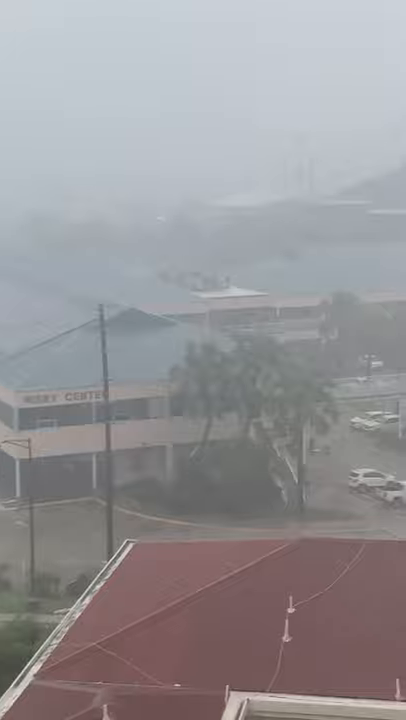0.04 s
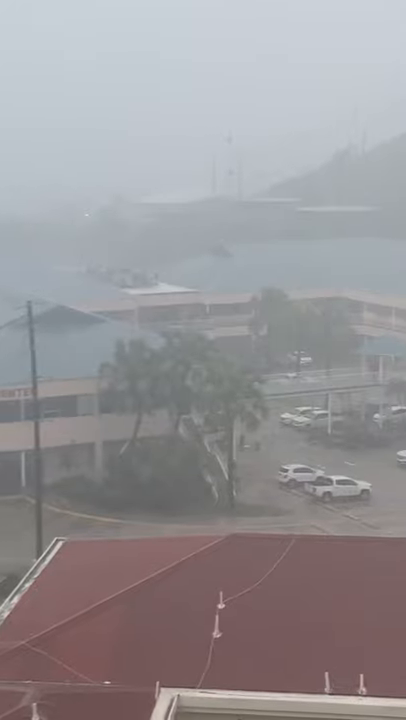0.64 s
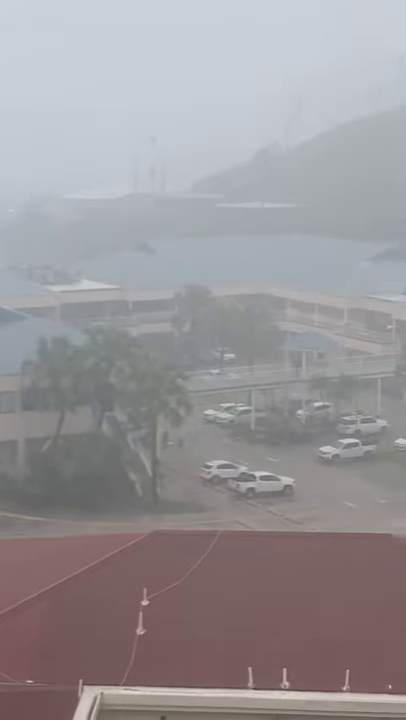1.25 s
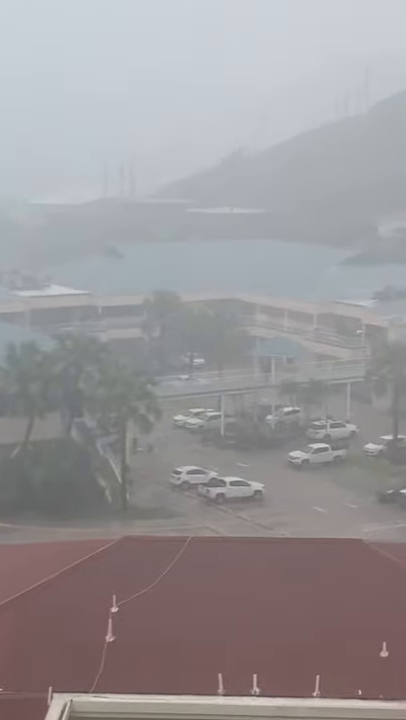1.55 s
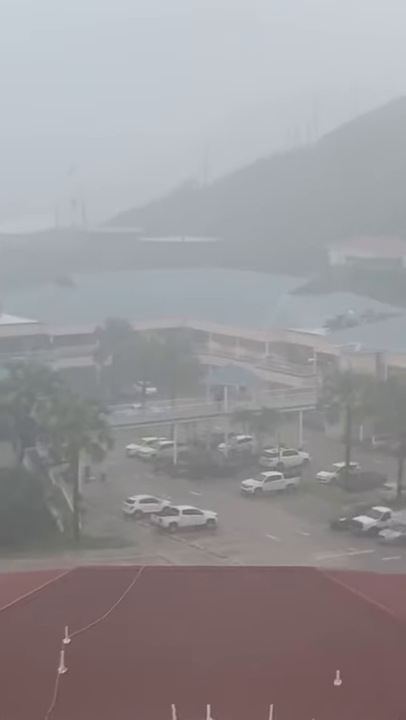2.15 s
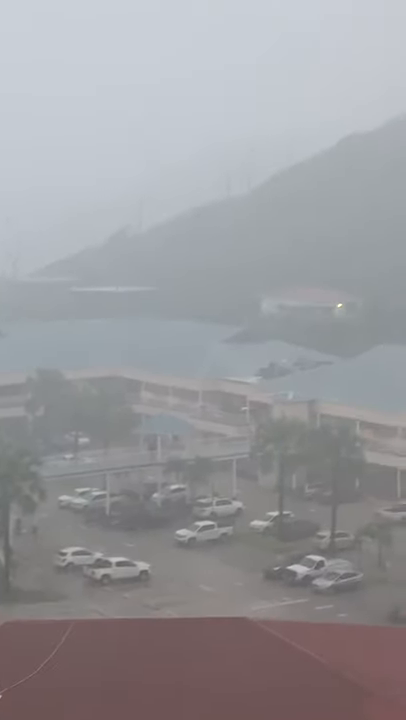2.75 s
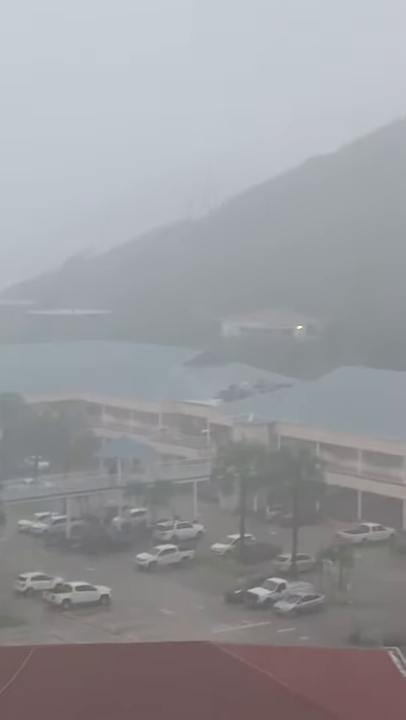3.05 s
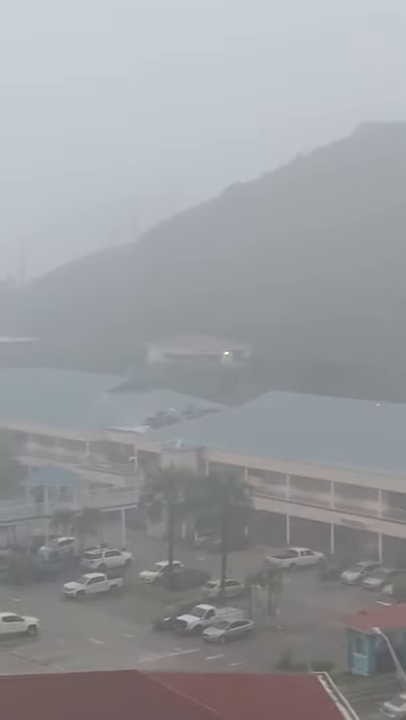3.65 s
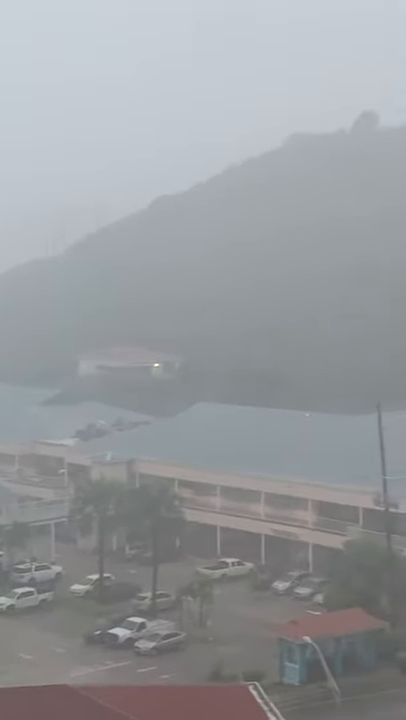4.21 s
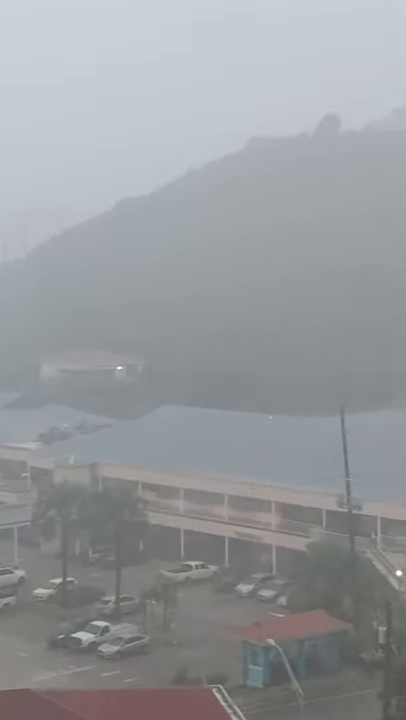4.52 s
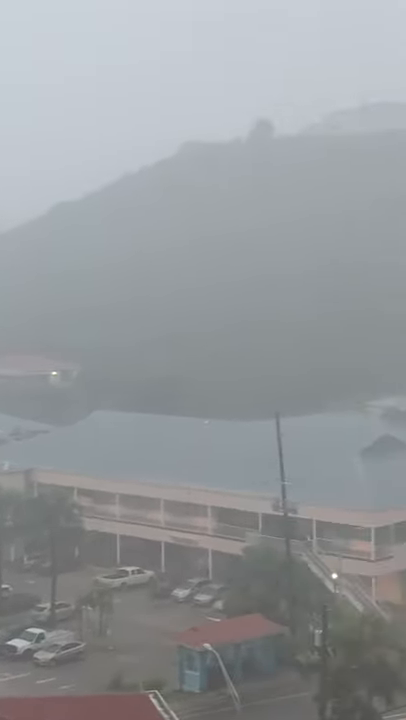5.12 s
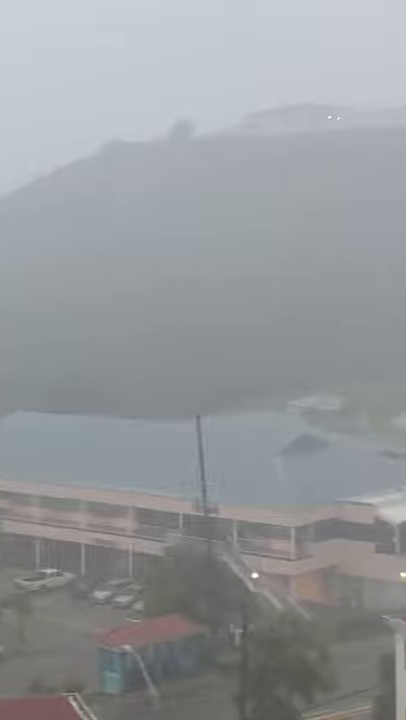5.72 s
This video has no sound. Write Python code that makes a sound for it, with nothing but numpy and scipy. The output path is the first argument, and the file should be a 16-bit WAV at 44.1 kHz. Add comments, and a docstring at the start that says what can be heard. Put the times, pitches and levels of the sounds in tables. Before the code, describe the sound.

Heavy rain falls without a break over roofs and a car park, heard through a phone on a high balcony. Distant drops blend into a wide wash with a grainy hiss, while nearer ones patter and ring faintly on roof sheets. Two tiny ticks land close by in the first half. Underneath, the town rumbles and machines, probably cooling units, give a low throbbing hum. The rain thickens very slightly.

```python
"""A high balcony above roofs and a car park, in a tropical downpour heard through a phone's two ports.
Countless far impacts superpose into a slowly thickening wash of noise with a grainy treble. Nearer
drops patter and set roof sheets ringing, and two tick close by. Underneath, the town rumbles and
two machines, probably cooling units, hum a few hertz apart, so that their tones beat."""
import sys
import numpy as np
from scipy import signal
from scipy.fft import rfft, irfft
from scipy.io import wavfile

SR = 44100
rng = np.random.default_rng(int(sys.argv[2]) if len(sys.argv) > 2 else 0)


def output_pcm(signal):
    """Save a mono or channel-first signal as 16-bit PCM at the path in sys.argv[1].

    Samples are clipped to [-1, 1] before scaling.
    """
    pcm = np.clip(np.atleast_2d(signal).T, -1, 1) * 32767
    wavfile.write(sys.argv[1], SR, np.round(pcm).astype(np.int16))


N = 254456
TIME = np.arange(N) / SR
FREQS = np.maximum(np.fft.rfftfreq(N, 1 / SR), 1)


def undb(db):
    """The decibel scale: 20 dB is a factor of ten in amplitude."""
    return 10 ** (np.asarray(db) / 20)


def level(x, db):
    """Normalisation: scale a signal to an rms level in dB."""
    return x * undb(db) / np.sqrt(np.mean(x ** 2))


def columns(table, at):
    """Linear interpolation of each later column of a table along the first."""
    key, *rest = np.transpose(table)
    return [np.interp(at, key, column) for column in rest]


def colour(x, points):
    """Spectral shaping by points of frequency in Hz and gain in dB, with a roll-off beyond both ends."""
    hz, db = np.transpose(points)
    roll_off = np.minimum(FREQS / hz[0], 1) ** 2 * np.minimum(hz[-1] / FREQS, 1) ** 4
    gain = undb(np.interp(np.log(FREQS), np.log(hz), db))
    return irfft(rfft(x) * roll_off * gain, N)


def walk(rate_hz):
    """Random modulation: low-passed noise of unit rms that changes about rate_hz times a second."""
    low_pass = np.exp(-(np.fft.rfftfreq(N, 1 / SR) / rate_hz) ** 2)
    return level(irfft(rfft(rng.standard_normal(N)) * low_pass, N), 0)


def impacts(per_s, scatter_db):
    """A Poisson process: impulses arrive independently of one another, most small and a few large."""
    lands = rng.random(N) < per_s / SR
    size = undb(scatter_db * np.minimum(rng.exponential(size=N), 5))
    return level(lands * size * rng.choice([-1, 1], N), 0)


def ports(ahead, around):
    """Partial coherence: both ports share sound from ahead; sound from all around makes them differ."""
    # Each row: frequency in Hz, left phase lead in radians, coherence from 0 to 1, left minus right in dB.
    port_response = [(60, -0.03, 0.99, -0.6), (280, -0.04, 0.93, -3.9), (460, 0.37, 0.71, -2.2),
                     (620, 1.65, 0.38, -1.7), (800, 2.14, 0.55, -2.4), (1100, 1.35, 0.41, -2.4),
                     (1450, 0.56, 0.67, -0.5), (2000, 0.7, 0.86, -0.4), (2350, -0.56, 0.34, -0.8),
                     (2550, 0.0, 0.06, -1.0), (2850, 0.68, 0.4, -0.6), (3200, 0.7, 0.58, 0.0),
                     (4650, 3.14, 0.96, 0.0), (15300, 18.85, 0.93, 0.0)]
    lead, coherence, balance_db = columns(port_response, FREQS)
    coherence = np.clip(coherence, 0, 1)
    side = np.array([[1], [-1]])
    common = np.sqrt((1 + coherence) / 2) * rfft(ahead)
    opposed = side * np.sqrt((1 - coherence) / 2) * rfft(around)
    return irfft((common + opposed) * undb(side * balance_db / 2) * np.exp(side * 1j * lead / 2), N)


def town():
    """Incoherent summation: traffic and water drumming on broad roofs merge into a low, wavering roar."""
    # Each row: frequency in Hz, relative spectral density of the roar in dB.
    roar_spectrum = [(20, -33), (33, -11), (48, -9), (60, -1.5), (78, -5.5), (105, 0.5), (150, -3),
                     (180, 0), (240, 1), (305, -3.5), (420, 0), (520, -6.5), (800, -14)]
    # Each row: time in seconds, level of the roar in dB.
    roar_levels = [(0.0, -38.5), (1.1, -39.5), (1.5, -39), (2.4, -38.5), (2.7, -39), (3.0, -39),
                   (3.6, -38.4), (4.0, -39), (5.15, -39), (5.77, -39)]
    rumble = colour(ports(rng.standard_normal(N), rng.standard_normal(N)), roar_spectrum)
    roar_db, = columns(roar_levels, TIME)
    return level(rumble, 0) * undb(roar_db + 0.34 * walk(rate_hz=5.2))


def machines():
    """Beats: two drifting tones throb at their difference frequency, 4 to 5 Hz, over a faint mains hum."""
    # Each row: time in seconds, then for each machine its pitch in Hz and its relative level in dB.
    machine_tones = [(0.0, 94.65, -43.9, 98.65, -45.8), (0.35, 95.07, -45.3, 99.41, -49.3),
                     (0.72, 95.28, -45.0, 99.35, -46.0), (0.95, 95.61, -40.0, 99.56, -43.4),
                     (1.3, 95.8, -41.5, 100.18, -47.2), (1.8, 96.39, -40.6, 100.58, -45.6),
                     (2.2, 96.84, -42.2, 101.84, -50.1), (2.6, 96.78, -42.3, 100.65, -44.3),
                     (2.9, 96.66, -40.9, 101.8, -46.0), (3.25, 96.74, -40.3, 101.24, -44.3),
                     (3.55, 96.58, -39.2, 101.86, -51.5), (3.85, 97.15, -40.1, 101.38, -48.0),
                     (4.2, 96.67, -40.9, 101.62, -48.2), (4.45, 96.64, -39.5, 101.94, -41.5),
                     (4.7, 97.37, -37.6, 100.71, -43.8), (4.95, 96.81, -38.2, 102.56, -44.0),
                     (5.3, 96.96, -37.0, 101.24, -42.4), (5.77, 96.38, -41.7, 101.5, -45.9)]
    mains_hz, in_phase_s = 120, 3.205
    first_hz, first_db, second_hz, second_db = columns(machine_tones, TIME)
    hum = level(np.sin(2 * np.pi * mains_hz * TIME), -52.5)
    for hz, db in ((first_hz, first_db), (second_hz, second_db)):
        cycles = np.cumsum(hz) / SR
        cycles -= np.interp(in_phase_s, TIME, cycles)
        waver_db = 0.56 * walk(rate_hz=8.5)  # moving air makes the distant tones waver
        hum += level(np.cos(2 * np.pi * cycles), 0) * undb(db + waver_db)
    return hum * undb([[-1.2], [1.1]])  # louder on the right


def pings(hits, pitch_hz, envelope):
    """Superposition: every impulse starts a decaying sinusoid at a pitch of its own."""
    age = TIME[:len(envelope)]
    sound = np.zeros(N + len(age))
    for i in np.flatnonzero(hits):
        sound[i:i + len(age)] += hits[i] * envelope * np.sin(2 * np.pi * pitch_hz[i] * age)
    return sound[:N]


def treble_grain():
    """Damped oscillation: faint, dense, short pings at random high pitches make the hiss grainy."""
    attack_s, decay_s = 0.00034, 0.011
    age = TIME[:1024]
    envelope = np.exp(-age / decay_s) * (1 - np.exp(-age / attack_s))
    hits = impacts(per_s=800, scatter_db=2.0)
    pitch_hz = rng.uniform(2508, 15540, N)
    grain = ports(pings(hits, pitch_hz, envelope), np.zeros(N))
    return level(colour(grain, [(2500, 1), (8000, 5), (15500, -3)]), -50.5)


def rail_drops():
    """Heavy damping: two drops land close by, perhaps on the balcony rail, each a single dry tick."""
    # Each row: start in seconds, relative level of the tick in dB.
    landings = [(1.4986, -29), (2.3739, -24)]
    tick_hz, decay_s = 8000, 0.00018
    ticks = np.zeros(N)
    for start_s, db in landings:
        age = np.maximum(TIME - start_s, 0)
        ticks += undb(db) * np.exp(-age / decay_s) * np.sin(2 * np.pi * tick_hz * age)
    return ports(ticks, np.zeros(N))


def near_drops():
    """Impact noise: splashes on the nearest roof, a few milliseconds long, barely rise out of the wash."""
    decay_s = 0.001
    splash = np.exp(-TIME[:512] / decay_s)
    strikes = [abs(impacts(per_s=160, scatter_db=1.6)) for _ in range(2)]
    envelopes = [signal.fftconvolve(hits, splash)[:N] for hits in strikes]
    patter = ports(*(envelope * rng.standard_normal(N) for envelope in envelopes))
    return level(colour(patter, [(900, 31), (2000, 5.0), (3500, -8), (8000, -14), (15000, -26)]), -47.5)


def roof_rings():
    """Free vibration: roof sheets struck by heavy drops ring briefly at their natural frequencies."""
    # Each row: mean frequency in Hz, its standard deviation in Hz, relative level in dB.
    resonances = [(1200.5, 199.6, -44.5), (2019, 99.5, -46.7)]
    attack_s, t60_s = 0.001, 0.13
    age = TIME[:4096]
    envelope = undb(-60 * age / t60_s) * (1 - np.exp(-age / attack_s))
    fields = np.zeros((2, N))
    for hz, spread_hz, db in resonances:
        for field in fields:
            hits = impacts(per_s=130, scatter_db=2.5)
            pitch_hz = hz + spread_hz * rng.standard_normal(N)
            field += level(pings(hits, pitch_hz, envelope), db)
    return ports(*fields)


def flutter(x, rate_hz):
    """Amplitude modulation: rain sweeps over different surfaces, so each half octave wavers on its own."""
    # Each row: frequency in Hz, rms depth of the wavering in dB.
    modulation_depths = [(600, 1.35), (2000, 0.88), (5000, 0.7), (12000, 1.0)]
    centres_hz = np.geomspace(250, 16000, 13)
    band_index = np.interp(np.log(FREQS), np.log(centres_hz), np.arange(len(centres_hz)))
    depths_db, = columns(modulation_depths, centres_hz)
    spectrum = rfft(x)
    wavering = np.zeros_like(x)
    for k, depth_db in enumerate(depths_db):
        band = irfft(spectrum * np.maximum(1 - abs(band_index - k), 0), N)
        wavering += band * undb(depth_db * walk(rate_hz))
    return wavering


def downpour(wash_db, spray_db):
    """Shot noise: dense far drops blur into a wash, and the spray above it follows its own swell."""
    # Each row: frequency in Hz, relative spectral density of the far rain in dB.
    rain_spectrum = [(300, -23), (600, -6.4), (700, -4.9), (850, -0.6), (1030, -0.3), (1350, -1.3),
                     (1660, -2.4), (2000, 0.8), (2250, -4.5), (2500, -6.9), (3150, -8.9), (4000, -12.3),
                     (4700, -14.2), (5500, -14.0), (6500, -15.3), (7400, -17.0), (8100, -14.9),
                     (10100, -17.7), (11100, -19.8), (13000, -21.2), (15750, -23.8)]
    crossover_hz = 2800
    fields = [level(rng.standard_normal(N), 0) + undb(-8.0) * impacts(per_s=9000, scatter_db=3.5)
              for _ in range(2)]
    sheets = flutter(ports(*fields), rate_hz=19.0)
    rain = level(colour(sheets, rain_spectrum), -35.5)
    spray = irfft(rfft(rain) / (1 + (crossover_hz / FREQS) ** 4), N)
    wash = rain - spray
    return wash * undb(wash_db) + spray * undb(spray_db)


def scene():
    """Sound pressures add: slowly thickening rain, far and near, over the town and its machines."""
    wash_db_per_s, spray_db_per_s, gust_db = 0.19, 0.05, 0.04
    elapsed_s = TIME - 1.2  # both rises pass through 0 dB at 1.2 s
    wash_db = wash_db_per_s * elapsed_s + gust_db * walk(rate_hz=2)
    rain = downpour(wash_db, spray_db_per_s * elapsed_s) + roof_rings() * undb(wash_db)
    texture = near_drops() + treble_grain() + rail_drops()
    return rain + texture + town() + machines()


def record(dry):
    """Band limiting: the phone's steep low-pass filter cuts the highest treble."""
    cutoff_hz = 15750
    return signal.sosfilt(signal.ellip(12, .1, 80, cutoff_hz, fs=SR, output="sos"), dry)


dry = scene()
out = record(dry)
output_pcm(out)
```